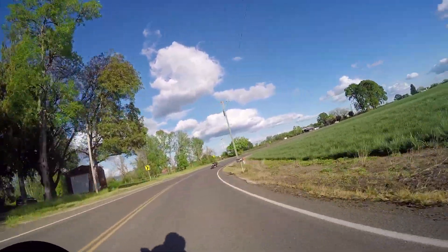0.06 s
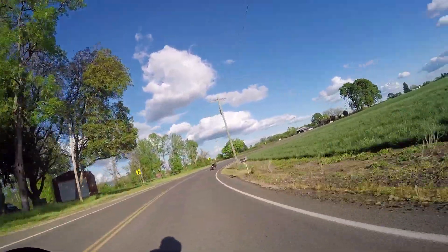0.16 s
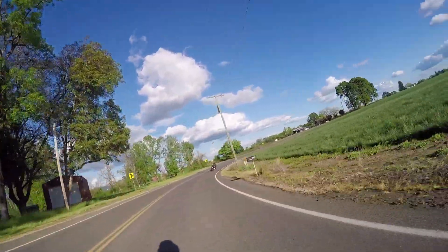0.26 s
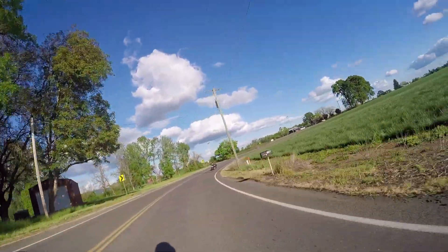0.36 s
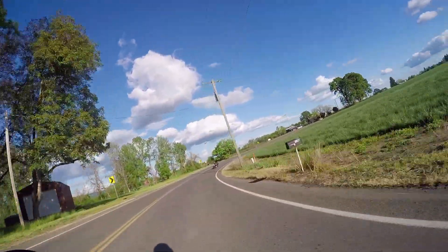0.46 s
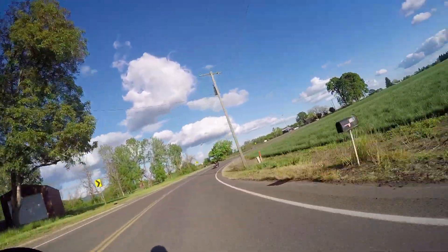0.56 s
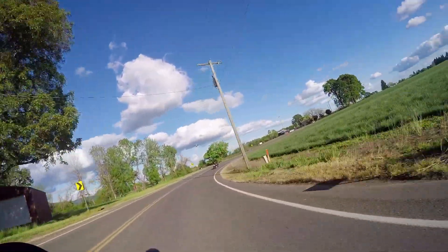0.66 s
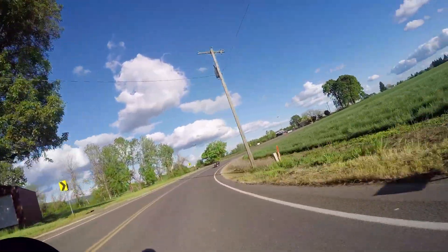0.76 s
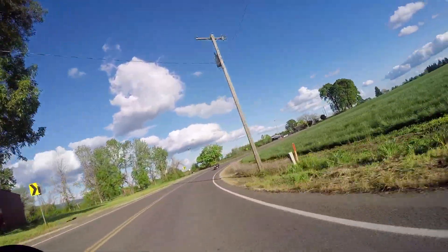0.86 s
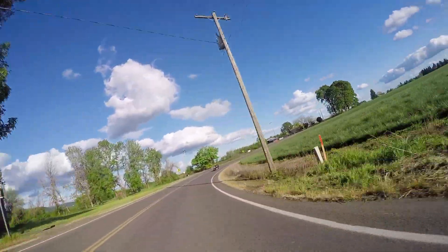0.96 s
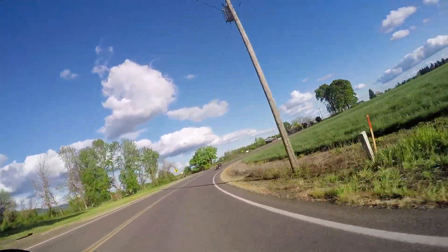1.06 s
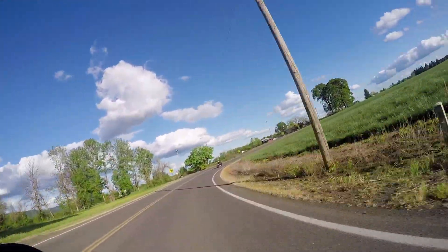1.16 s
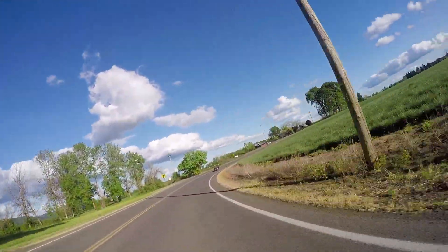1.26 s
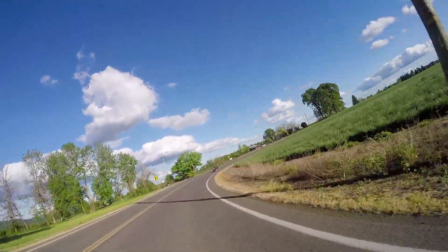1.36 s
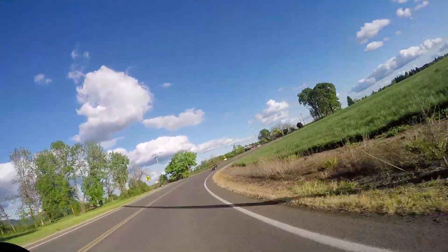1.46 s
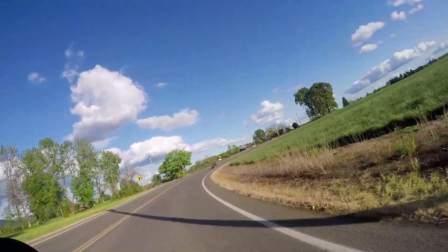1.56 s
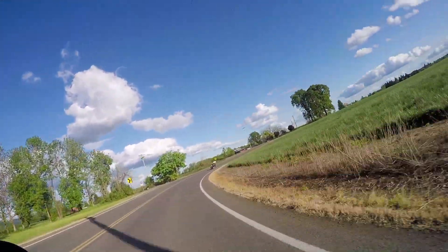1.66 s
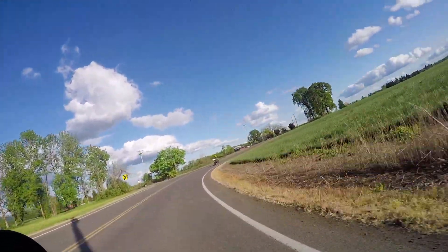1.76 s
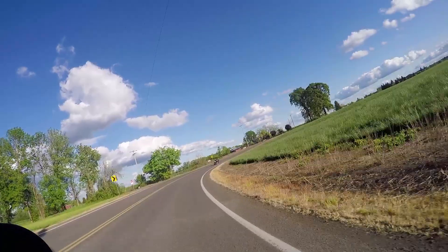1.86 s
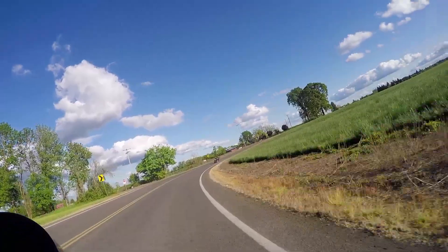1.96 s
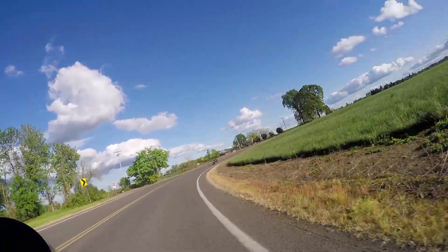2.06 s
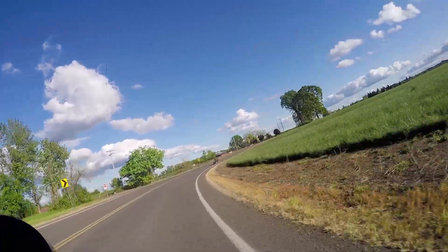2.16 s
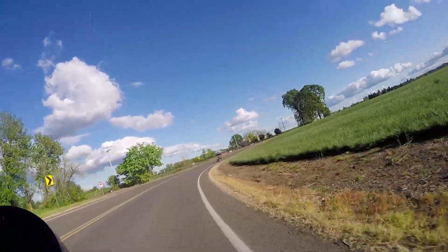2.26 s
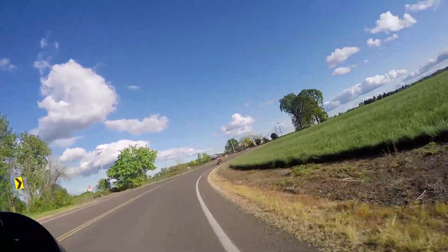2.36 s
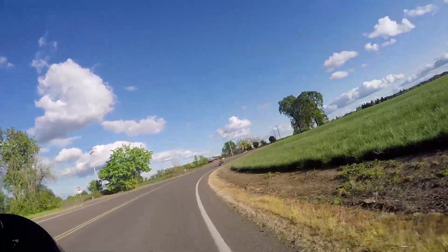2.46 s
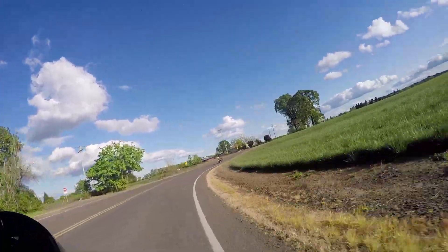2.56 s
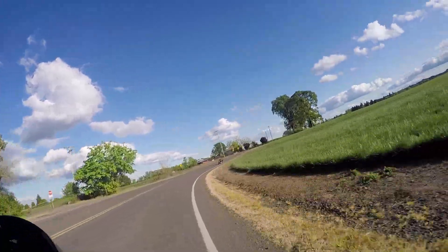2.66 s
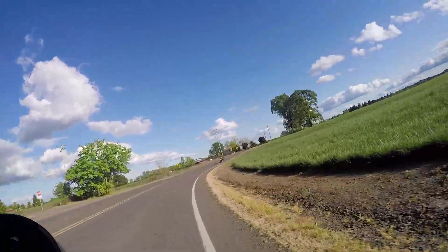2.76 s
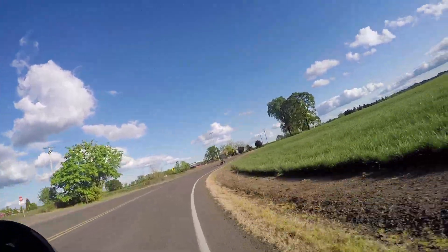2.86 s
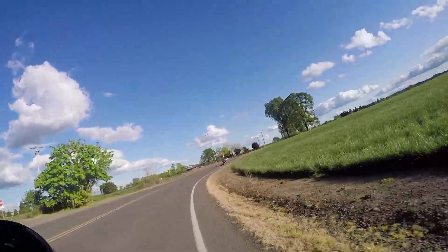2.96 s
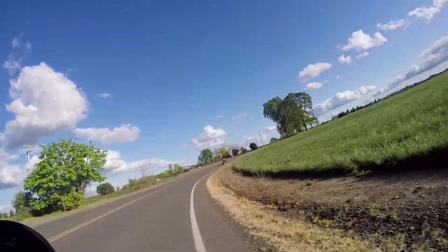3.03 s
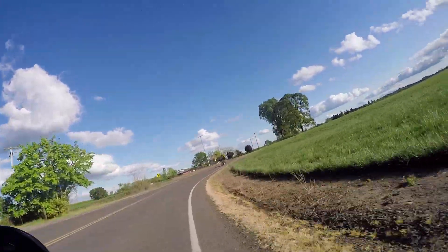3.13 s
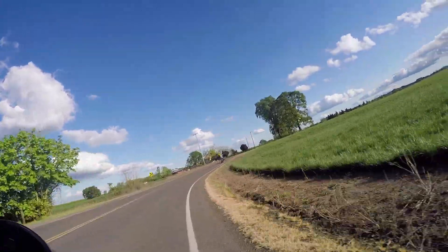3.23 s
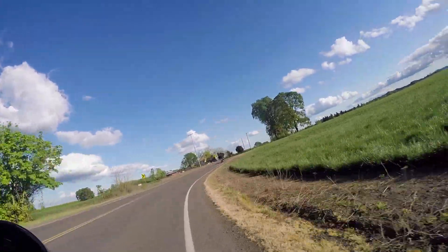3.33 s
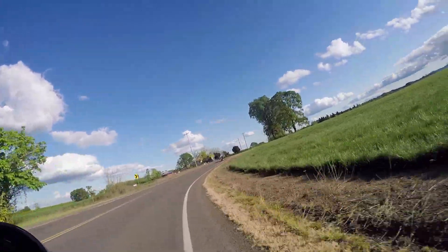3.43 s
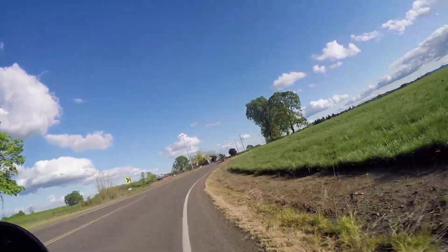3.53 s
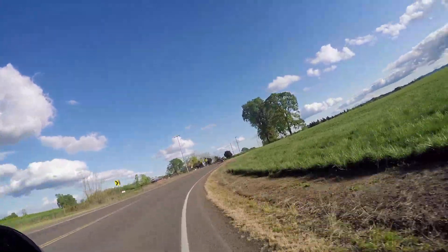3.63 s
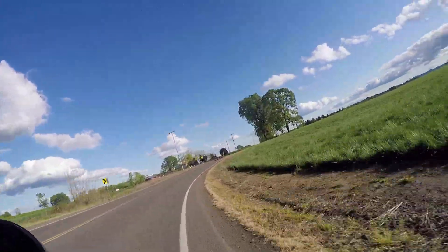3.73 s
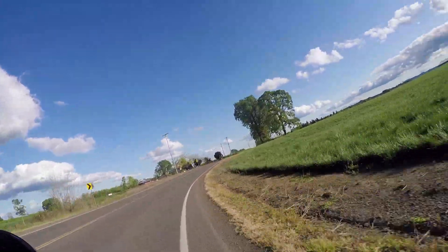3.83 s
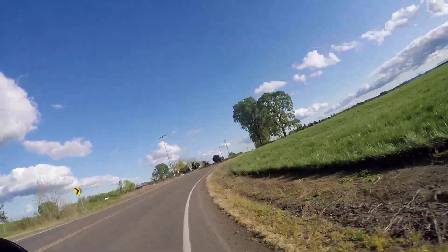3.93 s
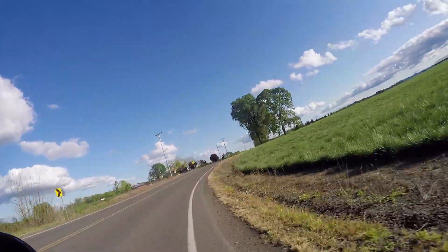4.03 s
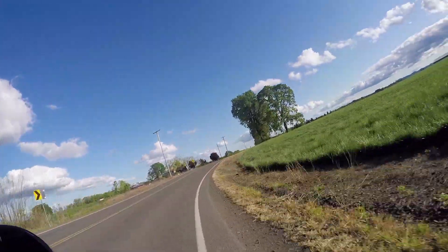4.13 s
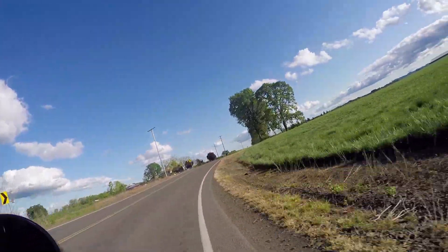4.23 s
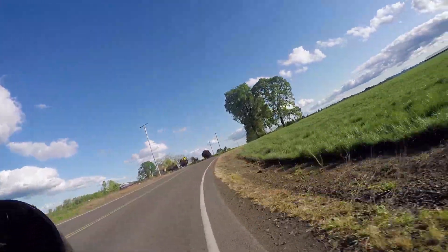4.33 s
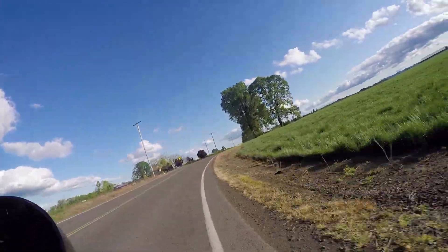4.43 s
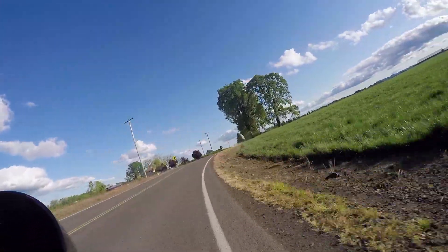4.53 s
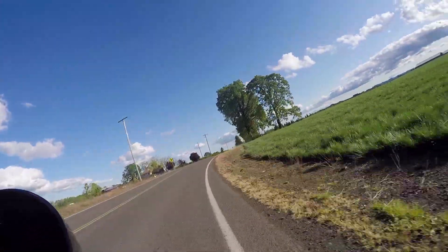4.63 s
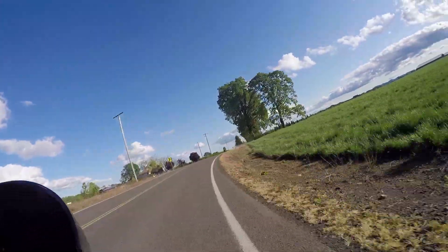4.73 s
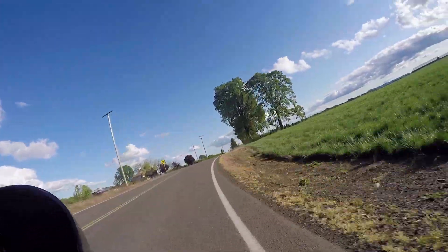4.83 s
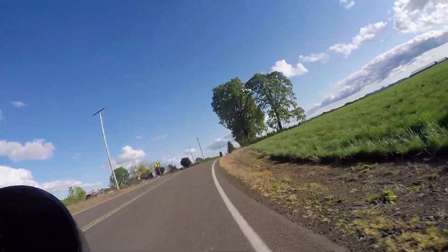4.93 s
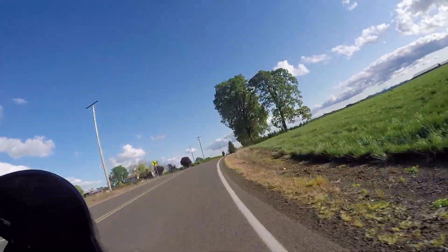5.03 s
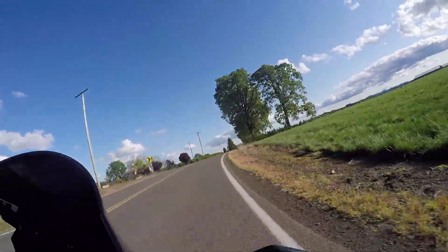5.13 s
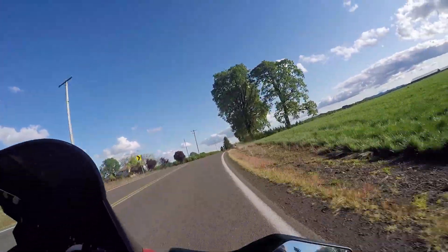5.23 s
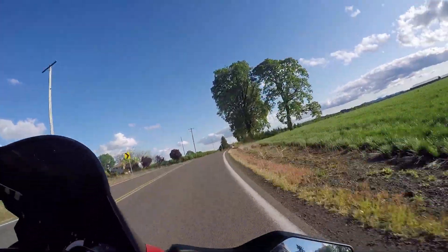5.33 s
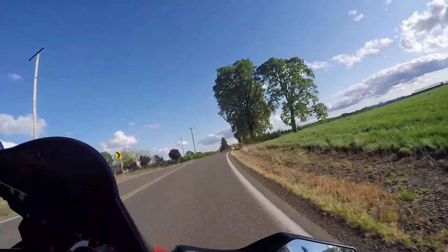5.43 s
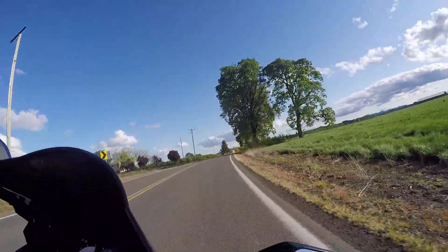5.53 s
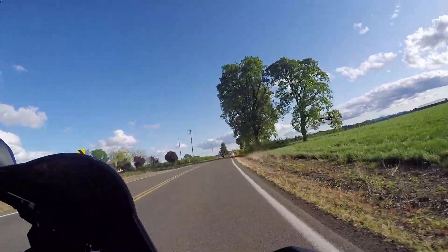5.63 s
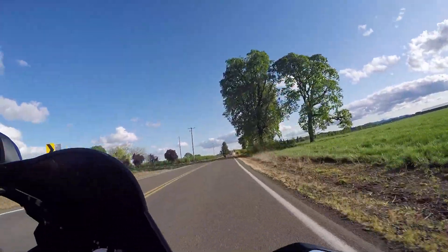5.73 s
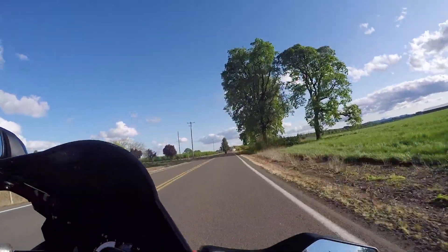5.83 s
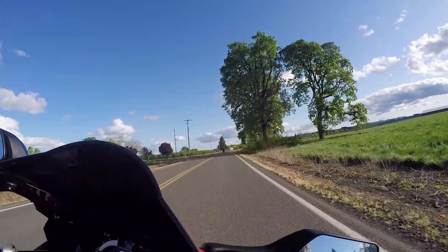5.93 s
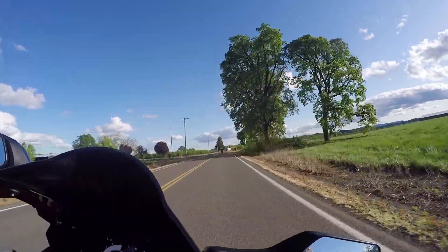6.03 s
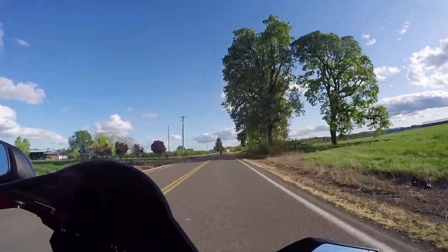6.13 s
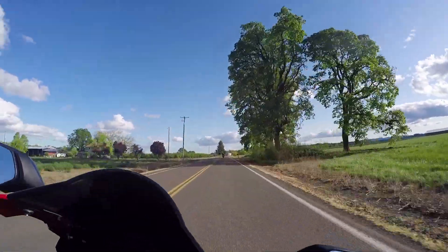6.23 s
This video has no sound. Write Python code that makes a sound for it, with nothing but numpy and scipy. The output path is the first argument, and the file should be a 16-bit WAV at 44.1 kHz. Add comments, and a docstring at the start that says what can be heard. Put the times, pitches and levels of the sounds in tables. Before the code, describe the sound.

Muffled wind buffets a microphone carried by a motorcycle rider on a rural road, while the engine runs at fairly high revs, creeping up in pitch. Low wind thumps and small knocks from the road come and go, and a tyre hum appears in the bend. Then the motorcycle pulls away harder, its engine louder and raspier under a deeper wind rumble.

```python
"""A four-cylinder motorcycle in a country bend, heard from a camera on the rider, dulled above 3.5 kHz.
From the start, engine orders sing through buffeting wind and faint circuit hiss, climbing from 5600 rpm.
From 0.8 s, pressure jumps thump at the microphone port and road seams rattle the mount.
From about 2 to 4.5 s the tyre tread hums in the lean. From 5 s the machine accelerates out:
the engine swells under load to 7400 rpm and the wind rumbles harder."""
import sys
import numpy as np
from scipy import signal
from scipy.fft import rfft, irfft
from scipy.io import wavfile
from scipy.ndimage import map_coordinates

SR = 44100
rng = np.random.default_rng(int(sys.argv[2]) if len(sys.argv) > 2 else 0)


def generate_wav(sig):
    """Save sig (samples, or channels by samples) to the path in sys.argv[1] as 16-bit PCM at SR."""
    pcm = np.round(np.clip(np.atleast_2d(sig).T, -1, 1) * 32767).astype(np.int16)
    wavfile.write(sys.argv[1], SR, pcm)


N = 277293


def amp(db):
    """dB to gain."""
    return np.exp(np.asarray(db) * (np.log(10) / 20))


def unit_rms(x):
    """Scale to rms 1."""
    return x / np.sqrt(np.mean(x ** 2) + 1e-20)


def butter(x, hz, kind):
    """Butterworth filter, 12 dB per octave."""
    return signal.sosfilt(signal.butter(2, hz, kind, fs=SR, output="sos"), x)


def in_time(rows):
    """Columns of a time table, one value per sample."""
    times_s, *columns = np.transpose(rows)
    return [np.interp(np.arange(N) / SR, times_s, column) for column in columns]


def at_hz(rows, hz, column=1):
    """Spectrum table interpolated over log frequency."""
    table = np.array(rows)
    return np.interp(np.log(np.maximum(hz, 1)), np.log(table[:, 0]), table[:, column])


def drift(rate_hz):
    """Smooth random wander, rms 1."""
    hop = 40
    pole = np.exp(-2 * np.pi * hop * rate_hz / SR)
    slow = signal.lfilter([1], [1, -2 * pole, pole * pole], rng.standard_normal(N // hop + 2002))[2000:]
    return np.interp(np.arange(N) / hop, np.arange(len(slow)), unit_rms(slow - slow.mean()))


def banded_noise(spectrum, span_hz, bands, shared_db, own_db, rate_hz):
    """Noise bands flickering partly together, partly alone; rms 1."""
    edges_hz = np.geomspace(*span_hz, bands + 1)
    white, together, out = rng.standard_normal((2, N)), drift(rate_hz), 0
    for k, (low, high) in enumerate(zip(edges_hz, edges_hz[1:])):
        level_db = at_hz(spectrum, np.sqrt(low * high)) + shared_db * together + own_db * drift(rate_hz)
        out += amp(level_db) * butter(white[k % 2], [low, high], "band")
    return unit_rms(out)


# Circuit noise floor (frequency [Hz], left [dB/Hz], right [dB/Hz])
HISS_SPECTRUM = [(4280, -107, -110), (9000, -109, -110), (10600, -113, -113), (12600, -110, -109),
                 (13500, -113, -113), (15300, -117, -108)]


def circuit_hiss(ticks_per_s=59.94, tone_hz=10406):
    """Independent hiss per channel, a buzz of alternating ticks and one thin tone."""
    hz = np.fft.rfftfreq(N, 1 / SR)
    shape = amp([at_hz(HISS_SPECTRUM, hz, column) for column in (1, 2)])
    low_shelf = amp(-12 * (hz < 4250))
    hiss = irfft(rfft(rng.standard_normal((2, N))) * shape * low_shelf, N) * np.sqrt(SR / 2)
    ticks = np.diff(np.floor(np.arange(N + 1) * ticks_per_s / SR))
    ticks *= (-1) ** np.cumsum(ticks)
    hiss += amp(-71) * butter(ticks, [5000, 13000], "band")
    hiss[1] += amp(-31) * butter(ticks, [14600, 15600], "band")   # right only
    return hiss + amp(-88) * np.sin(2 * np.pi * tone_hz * np.arange(N) / SR)


# Tread pitch, following road speed (time [s], frequency [Hz])
TREAD_PITCH = [(2.0, 527), (2.6, 539), (3.2, 551), (3.6, 557), (4.1, 562), (4.6, 569)]
# Tread hum (time [s], rms level [dB])
TREAD_LEVEL = [(0, -69.5), (2.0, -54), (2.5, -42), (2.9, -45), (3.4, -38.5), (3.8, -40.5), (4.2, -46),
               (4.5, -47), (4.8, -60.5), (6.29, -70.5)]


def tyre_hum():
    """The tread hums a lightly wavering tone during the lean."""
    (hz,), (level_db,) = in_time(TREAD_PITCH), in_time(TREAD_LEVEL)
    peak = np.sqrt(2) * amp(level_db + drift(10))
    return peak * np.sin(2 * np.pi * np.cumsum(hz) / SR + 0.27 * drift(11))


# Road seam hits (time [s], rattle [dB], low mode [dB], high mode [dB])
SEAM_HITS = [(0.855, -35.5, -26, -39), (1.628, -32, -22, -39), (1.912, -34.5, -16, -40),
             (2.586, -31, -13, -36), (4.504, -36, -30, -37), (4.722, -38, -32, -19), (5.105, -35, -26, -42),
             (5.128, -42, -42, -26), (6.187, -34.5, -18, -32.5)]
# Mount modes, low then high (frequency [Hz], t60 [s])
MOUNT_MODES = [(260, 0.03), (1230, 0.035)]


def mount_rattle(t60_s=0.1, band_hz=(250, 1600), cut_hz=160):
    """Each seam sets off a dull noise burst and rings the mount, which passes no deep bass."""
    times_s, *levels_db = np.transpose(SEAM_HITS)
    hits = np.full((3, N), 1e-18)
    hits[:, np.round(times_s * SR).astype(int)] = amp(levels_db)
    decay = signal.lfilter([1], [1, -amp(-60 / (t60_s * SR))], hits[0])
    out = decay * unit_rms(butter(rng.standard_normal(N), band_hz, "band"))
    for (hz, ring_s), blows in zip(MOUNT_MODES, hits[1:]):
        radius, angle = amp(-60 / (ring_s * SR)), 2 * np.pi * hz / SR
        out += signal.lfilter([0, np.sin(angle)], [1, -2 * radius * np.cos(angle), radius ** 2], blows)
    return butter(out, cut_hz, "high")


# Pressure steps at the microphone port (time [s], size [dB], sign)
PRESSURE_STEPS = [(0.756, -25, -1), (1.057, -24.5, -1), (1.257, -30, -1), (1.534, -20.5, -1),
                  (1.738, -33, 1), (1.913, -43, 1), (2.262, -29, 1), (2.587, -25, -1), (2.757, -24, 1),
                  (3.523, -27, -1), (3.759, -22, 1), (4.262, -26, -1), (5.108, -29, -1), (5.274, -31, -1),
                  (5.856, -39.5, 1), (6.135, -33, 1), (6.206, -33, -1)]


def port_thumps(rise_hz=400, leak_hz=65):
    """Pressure jumps within a millisecond or two, then leaks away through the port."""
    pressure = np.full(N, 1e-18)
    for time_s, size_db, sign in PRESSURE_STEPS:
        pressure[round(time_s * SR):] += sign * amp(size_db)
    return butter(butter(pressure, rise_hz, "low"), leak_hz, "high")


# Airflow (time [s], buffet rms [dB], rumble rms [dB])
WIND_LEVELS = [(0, -36, -55.5), (.5, -37, -45.5), (.62, -32.5, -53.5), (1.0, -34, -57.5), (1.9, -31.5, -48),
               (2.4, -31, -46.5), (3.1, -30, -54.5), (3.3, -30, -57), (4.0, -30.5, -56),
               (4.95, -31.5, -38.5), (5.1, -28, -33.5), (5.24, -31, -31), (5.32, -29.5, -34.5),
               (5.46, -28.5, -31), (5.6, -26.5, -31), (5.78, -31.5, -35), (5.84, -22.5, -39),
               (5.9, -28, -27.5), (5.97, -25.5, -43), (6.03, -32.5, -26), (6.22, -23, -26.5),
               (6.29, -38, -31)]
# Buffeting (frequency [Hz], relative density [dB])
BUFFET_SPECTRUM = [(40, -28.5), (90, -26.5), (120, -22), (150, -8.5), (190, -4.5), (250, -3), (320, -6.5),
                   (400, -8), (600, -12.5), (900, -14.5), (1400, -27), (2500, -33.5)]
# Deep rumble (frequency [Hz], relative density [dB])
RUMBLE_SPECTRUM = [(45, -28), (70, -15), (110, -2), (190, -6), (260, -4)]
# Narrow-band eddies (frequency [Hz], relative density [dB])
FLUTTER_SPECTRUM = [(170, -7), (245, 5.5), (340, -8)]


def wind(flutter_db=-7):
    """Eddies buffet the case; a deeper, lumpier rumble grows with speed."""
    buffet_db, rumble_db = in_time(WIND_LEVELS)
    buffet = banded_noise(BUFFET_SPECTRUM, (28, 3900), bands=16, shared_db=1, own_db=0.43, rate_hz=89)
    rumble = banded_noise(RUMBLE_SPECTRUM, (45, 280), bands=7, shared_db=1.2, own_db=2.2, rate_hz=10)
    flutter = banded_noise(FLUTTER_SPECTRUM, (170, 340), bands=8, shared_db=0.95, own_db=2.5, rate_hz=5.1)
    return amp(buffet_db) * (buffet + amp(flutter_db) * flutter) + amp(rumble_db) * rumble


# Valve-train rasp (time [s], body level [dB], bright edge level [dB])
VALVE_LEVELS = [(0, -43.5, -64.5), (.75, -43, -58.5), (1.5, -45, -61.5), (2.5, -44.5, -64.5),
                (3.5, -43.5, -59), (4.7, -44, -58), (4.95, -44, -50.5), (5.5, -42.5, -46.5),
                (5.57, -40.5, -58), (5.64, -35, -48.5), (5.7, -41, -55), (6.0, -41.5, -49),
                (6.18, -39, -50), (6.29, -41, -45.5)]
# Rasp body (frequency [Hz], relative density [dB])
BODY_SPECTRUM = [(900, -8.5), (1200, -10), (1700, -15.5), (2200, -19), (2700, -20), (3300, -18),
                 (3700, -25)]
# Bright edge (frequency [Hz], relative density [dB])
EDGE_SPECTRUM = [(2100, -2.5), (2500, 0.5), (3000, -3.5), (3500, -11.5)]


def valve_rasp(cycle_rad):
    """Valve-train noise, pulsing with each firing and each cycle."""
    body_db, edge_db = in_time(VALVE_LEVELS)
    pulse = 1 + 0.24 * np.cos(4 * cycle_rad) + 0.14 * np.cos(cycle_rad)
    body = banded_noise(BODY_SPECTRUM, (900, 3900), bands=7, shared_db=0.7, own_db=1.64, rate_hz=16)
    edge = banded_noise(EDGE_SPECTRUM, (2000, 3600), bands=5, shared_db=2, own_db=5, rate_hz=9.9)
    return pulse * (amp(body_db) * body + amp(edge_db) * edge)


# Path through intake, fairing and case (frequency [Hz], gain [dB])
COMB_RESPONSE = [(90, -19), (250, -3), (600, 7), (1000, -5), (1400, 3), (1900, -10.5), (2500, 0),
                 (3500, -18)]


def cylinder_comb(cycle_rad, cycle_hz, load_db, order_limit=62):
    """Unequal cylinders fill in the orders outside TONE_ORDERS; each wanders in level."""
    _, edge_db = in_time(VALVE_LEVELS)
    top_db = 0.55 * (edge_db - edge_db.max())   # top orders follow the rasp's edge
    out = 0
    for order in sorted(set(range(3, order_limit)) - set(TONE_ORDERS)):
        firing_db = 1.2 * (order % 4 == 0)
        level_db = at_hz(COMB_RESPONSE, order * cycle_hz) + firing_db + top_db * (order > 33)
        gain = amp(level_db + 3 * drift(0.9))
        out += gain * np.sin(order * cycle_rad + 0.17 * drift(6.4) + rng.uniform(0, 2 * np.pi))
    drive_db = -38.5 + 0.42 * np.minimum(load_db, 1.5)
    return amp(drive_db) * out / np.sqrt(order_limit)


# Intake and fairing resonances (centre [Hz], width [Hz], lift [dB])
INTAKE_RESONANCES = [(395, 8.7, 14.5), (489, 21, 12), (598.5, 32, 14), (660.5, 15, 6), (725.6, 18.4, 29),
                     (782.8, 36, 27.5), (823, 60, 24.5), (958.6, 45, 15.5), (1004.5, 121, 18),
                     (1287, 87, 14.5), (1720, 110, 9), (1804, 81, 7.5), (1900, 31, 8.5), (1965, 62, 8.5),
                     (2264, 70, 9), (2424, 65, 13.5), (2567, 25, 11.5), (3030, 140, 7.5)]


def resonance_db(hz):
    """Lift of a tone sweeping through the steep-sided resonances."""
    grid_hz = np.linspace(hz.min(), hz.max(), 600)
    power = sum(amp(2 * lift_db) / (1 + (2 * (grid_hz - centre_hz) / width_hz) ** 2) ** 2
                for centre_hz, width_hz, lift_db in INTAKE_RESONANCES)
    return np.interp(hz, grid_hz, 10 * np.log10(1 + power))


# Swells by order: (centre [s], half-height width [s], change [dB])
ORDER_SWELLS = {"3": [(1.2, 1.5, -10.5)], "4": [(3.6, 1.6, -9), (5.5, 1.2, -3.5)], "5": [(1.9, .7, 3.5),
                (5.6, 1.4, -7)], "29": [(6.05, .25, 5.5)], "30": [(5.85, .3, 4.5)], "35": [(5.8, .3, 7.5)],
                "8": [(.6, 0.15, 9.5), (.88, 0.14, 6.5), (1.15, 0.36, -12), (4.5, .7, 7.5), (5.6, 0.24, -6),
                (5.85, 0.23, 4)], "10": [(3.9, 1.5, 2), (5.7, .6, 4)], "11": [(.4, 0.89, -6),
                (4.2, .6, -9.5), (6.2, 0.33, 5)], "12": [(0.12, 0.26, 7.5), (0.68, 0.32, -10.5),
                (3.98, 0.48, 7), (4.8, .5, -3), (2.3, .6, 1.5)], "13": [(4.8, 1.1, 6.5), (5.8, .25, -6.5)],
                "16": [(.2, 0.22, 7), (.95, 0.28, 2.5), (5.92, 0.11, 4), (6.25, 0.149, 5.5)],
                "14": [(5.49, 0.46, 2), (.2, 0.35, -1), (3.9, 0.99, 5), (5.95, 0.45, -13.5)],
                "15": [(.45, 0.34, -8.5), (1.3, 0.77, 8.5), (5.6, .2, 7)], "17": [(.25, 0.22, 8),
                (.3, 0.62, -10.5), (2.4, 0.77, 4), (4.2, 1.3, -11), (5.9, 0.17, 2.5), (6.2, .3, 9.5)],
                "19": [(1, .3, 3.5), (.3, .6, 13.5), (5.3, .3, 11.5)], "20": [(3.5, .6, -10),
                (4.8, 0.59, 8.5), (6.0, 0.57, -9)], "21": [(.35, .2, 0), (3.45, 0.29, 8.5), (4.6, 0.56, 6),
                (5.6, 0.26, 10), (5.85, 0.15, -9.5), (.05, 0.11, -9), (.75, 0.28, -4), (5.93, 0.17, -8.5)],
                "22": [(4.7, 1, 10.5), (5.5, .2, -5.5), (6.25, .2, 6.5)], "23": [(.6, 1, -14.5),
                (4.62, 0.13, -6), (4.93, 0.13, -5), (5.7, 1.4, -3)], "24": [(2.9, 0.84, 10.5),
                (5.9, .8, 10)], "28": [(2.4, .8, 6), (4.9, 1.1, 1)], "31": [(5.8, .5, 10.5)],
                "32": [(4.8, 0.45, -9.5), (1, 1.6, -5), (5.68, .2, 5), (5.97, .15, -8.5)],
                "33": [(4.6, 1.14, -11.5), (5.25, 0.31, -10.5), (5.6, .25, 6)], "36": [(1.4, .7, 3.5),
                (.5, 0.45, -3), (2.8, 1, -6.5), (4.05, 0.3, 8.5), (4.65, 0.42, -8), (5.3, .3, 4),
                (6.0, .6, 6)], "38": [(1.4, 1.2, -9.5), (5.85, .4, 0), (4, .3, 4), (5.2, .5, -5)],
                "42": [(4.7, 0.55, -6), (3.8, .7, -7), (6.1, 0.13, 11), (6.27, 0.088, -10)],
                "43": [(4.95, 0.2, 8), (5.85, .3, -7), (6.1, .4, 9)], "47": [(5.1, .5, 3),
                (6.15, 0.33, 7.5)], "48": [(4.95, .3, 14), (5.65, .15, 8)], "50": [(1.4, .9, 14),
                (4.45, .15, 16), (4.9, .5, 12), (5.45, .1, 7.5), (5.95, 0.37, 8)], "46": [(.5, .8, -5),
                (5.45, .15, 6)], "51": [(4.35, .3, 4), (6.1, .3, 18)]}


def swell_db(order):
    """Bell-shaped rises and dips of one order."""
    grid_s = np.arange(0, N + 256, 256) / SR
    bells_db = np.zeros_like(grid_s)
    for centre_s, width_s, change_db in ORDER_SWELLS.get(str(order), []):
        bells_db += change_db * np.exp(-4 * np.log(2) * ((grid_s - centre_s) / width_s) ** 2)
    return np.interp(np.arange(N) / SR, grid_s, bells_db)


# Engine tones with their own levels, strong and faint (order [multiple of cycle rate])
TONE_ORDERS = (8, 9, 10, 11, 12, 13, 14, 15, 16, 17, 19, 20, 21, 22, 23, 24, 28, 29, 31, 32, 33, 34, 36, 38,
               42, 43, 46, 47, 50, 51, 48, 3, 4, 5, 30, 35)
# Base level per order, off resonance (rms level [dB])
ORDER_BASE_DB = (-53, -60, -73, -51.5, -52.5, -81, -68.5, -69.5, -56.5, -62.5, -72, -59, -63, -70.5, -63,
                 -71, -66, -66.5, -73.5, -65, -65.5, -72, -67, -65, -66.5, -79.5, -74.5, -74.5, -75, -78.5,
                 -77.5, -49.5, -46.5, -48.5, -72.5, -73)
# Swing of the high whines (time [s], gain [dB])
WHINE_GAIN = [(0, -7), (.5, 2.5), (1, 0.5), (1.5, 1), (2, 2.5), (3, 3), (3.5, 4), (4, -2.5), (4.5, 3.5),
              (4.75, 9.5), (5, 6.5), (5.25, 7.5), (5.5, 3.5), (5.75, 10), (6, 9.5), (6.29, 4)]


def engine_tones(cycle_rad, cycle_hz, lower_db, upper_db, crossover_hz=(880, 920), whine_from_hz=1150):
    """Clean, lightly wavering engine tones that swell with load and on crossing a resonance."""
    whine_db, = in_time(WHINE_GAIN)
    levels_db = {}
    for order, base_db in zip(TONE_ORDERS, ORDER_BASE_DB):
        hz = order * cycle_hz
        upper_share = 1 if order > 16 else np.interp(hz, crossover_hz, [0, 1])
        blend_db = (1 - upper_share) * lower_db + upper_share * upper_db
        load_db = np.where(hz > whine_from_hz, whine_db, blend_db)
        levels_db[order] = base_db + load_db + resonance_db(hz) + swell_db(order)
    # Order 16 is lopsided: its octave grows with its amplitude squared.
    octave_db = 2 * levels_db[16] + 7 + swell_db(32)
    levels_db[32] = 10 * np.log10(amp(2 * levels_db[32]) + amp(2 * octave_db))
    out = 0
    for order, level_db in levels_db.items():
        phase = order * cycle_rad + 0.17 * drift(19) + rng.uniform(0, 2 * np.pi)
        out += np.sqrt(2) * amp(level_db + 1.18 * drift(32)) * np.sin(phase)
    return out


# Engine speed (time [s], four-stroke cycle rate [Hz])
CYCLE_RATE = [(0.0, 46.79), (0.5, 48.49), (0.78, 49.42), (0.98, 49.4), (1.5, 50.3), (1.75, 50.3),
              (2.0, 50.72), (2.75, 51.33), (3.1, 52.2), (3.5, 52.92), (4.25, 54.59), (4.5, 55.01),
              (4.75, 55.58), (5.0, 56.38), (5.22, 57.33), (5.5, 58.16), (5.75, 59.18), (6.0, 60.4),
              (6.29, 61.64)]
# Tone gain with load (time [s], lower tones [dB], upper tones [dB])
LOAD_GAIN = [(0.0, -2.5, -4), (0.25, -3, 2.5), (0.5, -2, 7.5), (0.75, -3, 4.5), (1.0, -4.5, -1),
             (1.5, -4.5, -4), (2.0, -3, -0.5), (2.5, -3, -2.5), (3.0, -4, 1), (3.5, -1, 0), (4.0, -1.5, 4),
             (4.5, 0.5, 1), (4.75, 1, -1), (5.0, 3, 1.5), (5.25, 8, 1.5), (5.5, 7.5, 15.5),
             (5.75, 9.5, 15.5), (6.0, 7.5, 8.5), (6.29, 12, -9.5)]


def engine():
    """Tones, comb and rasp share one crank; its uneven running roughens the high orders most."""
    cycle_hz, = in_time(CYCLE_RATE)
    lower_db, upper_db = in_time(LOAD_GAIN)
    cycle_rad = 2 * np.pi * np.cumsum(cycle_hz) / SR + 0.005 * drift(18)
    rasp = valve_rasp(cycle_rad)
    tones = engine_tones(cycle_rad, cycle_hz, lower_db, upper_db)
    return rasp + tones + cylinder_comb(cycle_rad, cycle_hz, lower_db)


def scene(left_lag_samples=5.5):
    """One sound at the case, reaching the right port first."""
    right = engine() + tyre_hum() + wind() + port_thumps() + mount_rattle()
    left = map_coordinates(right, [np.arange(N) - left_lag_samples], order=3, mode="nearest")
    return np.array([left, right])


def record(dry, wind_filter_hz=3500, cutoff_hz=15300):
    """Wind filter dulls the sound, circuits add hiss, a low-pass cuts the top."""
    wind_filter = signal.ellip(9, 0.5, 70, wind_filter_hz, fs=SR, output="sos")
    top_cut = signal.ellip(12, 0.5, 70, cutoff_hz, fs=SR, output="sos")
    return signal.sosfilt(top_cut, signal.sosfilt(wind_filter, dry) + circuit_hiss())


dry = scene()
out = record(dry)
generate_wav(out)
```